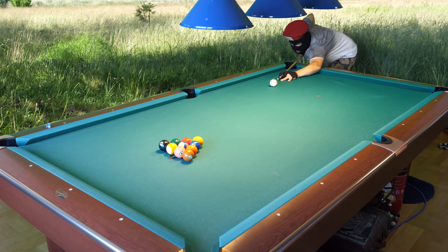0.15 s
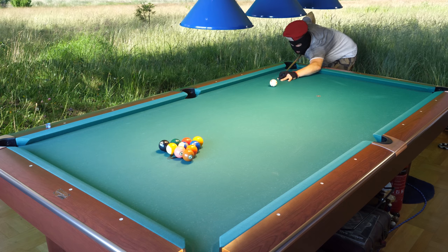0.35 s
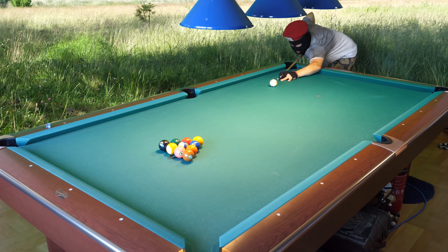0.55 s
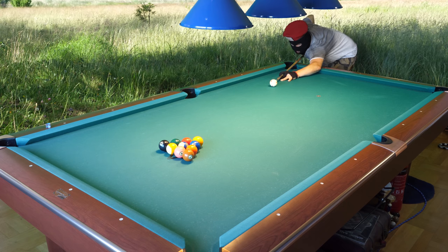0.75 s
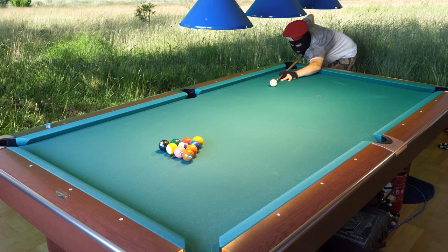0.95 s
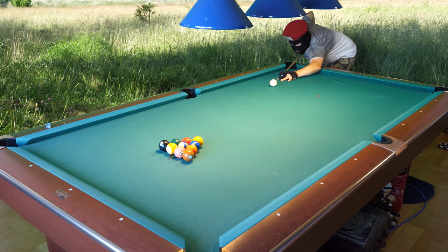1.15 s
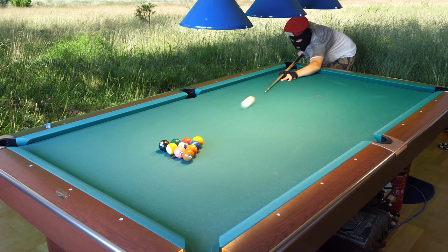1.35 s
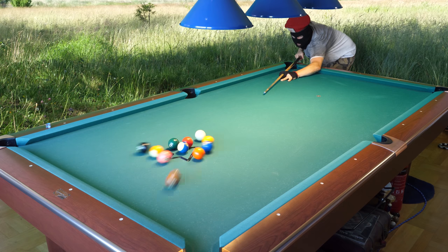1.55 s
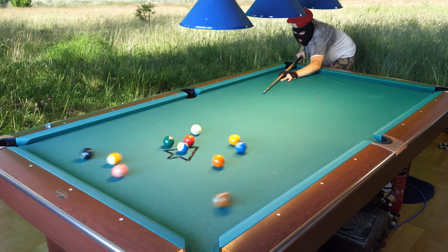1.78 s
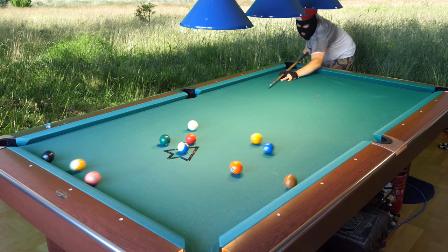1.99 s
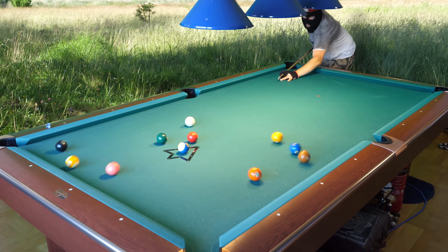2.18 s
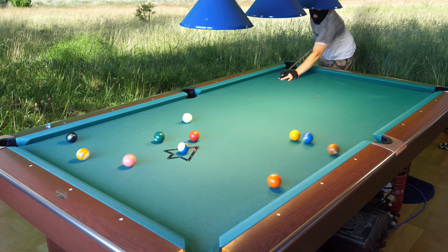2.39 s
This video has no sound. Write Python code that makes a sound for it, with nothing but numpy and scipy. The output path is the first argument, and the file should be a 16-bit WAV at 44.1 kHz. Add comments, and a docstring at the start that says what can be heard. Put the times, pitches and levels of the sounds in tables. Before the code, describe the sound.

A pool break, heard from the foot of the table in an open-air shelter. After faint outdoor air, a cue strike leads to sharp, slightly distorted cracks, followed by dull cushion thumps, low rolling and two ball clicks.

```python
"""Pool balls crack together in a break, each impact a short pressure pulse that excites an echoing shelter.
The cue strikes first and rings in its modes; the cue ball bursts the rack, balls thump into the cushions
and rumble over the resonant bed, then two pairs click. Cloth scuffs softly over the air of a meadow.
Heard from the foot of the table, the loud cracks overload the recorder, which clips them."""
import sys
import numpy as np
from scipy import signal
from scipy.fft import rfft, irfft, next_fast_len
from scipy.io import wavfile
from scipy.ndimage import map_coordinates

SR = 44100
rng = np.random.default_rng(int(sys.argv[2]) if len(sys.argv) > 2 else 0)


def digitize_waveform(pressure):
    """Quantize a signal to 16-bit integers and store it at the path in sys.argv[1].

    Rows of a 2-D input are taken as channels; values are limited to [-1, 1].
    """
    field = np.atleast_2d(pressure).T
    bounded = np.clip(field, -1, 1)
    quanta = np.round(bounded * 32767).astype(np.int16)
    wavfile.write(sys.argv[1], SR, quanta)


N = 106942
T = np.arange(N) / SR


# ball-on-ball impacts (time [s], level [dB], frequency scale [ratio], tail over direct sound [dB])
COLLISIONS = [(1.545, 38, 1.09, 4), (1.551, 34.5, 0.9, 5.5), (1.577, 37, 1.023, 4), (1.605, 32, 1.035, 7.5),
              (2.287, 26.5, .98, 3.5), (2.421, 16.5, 1.02, -7)]
# one contact pulse, a main lobe and weak side lobes (frequency [Hz], level [dB])
CONTACT_SPECTRUM = [(60, -16.5), (300, -32.5), (650, -14.5), (1100, -5.5), (1600, -0.5), (2100, 0.5),
                    (2800, -2), (3400, -11.5), (4300, -29), (5800, -34), (7500, -32), (10000, -33.5),
                    (12200, -25.5), (14200, -27), (16000, -40)]
def ball_clicks():
    """Elastic impact: a shorter contact has a higher spectrum; all the ring is the shelter's."""
    return sum(impact(time, db, lambda hz: along(CONTACT_SPECTRUM, hz / scale), tail_db)
               for time, db, scale, tail_db in COLLISIONS)


# knock of the tip on the cue ball (frequency [Hz], level [dB])
KNOCK_SPECTRUM = [(40, -28), (120, -16), (350, -3.5), (620, -2.5), (1000, -6.5), (1900, -10.5),
                  (2600, -8.5), (3000, -15), (4000, -16.5), (7500, -20.5), (10000, -23), (15000, -20.5)]
# short tock of the tip itself (frequency [Hz], level [dB], T60 [s])
TIP_MODES = [(874, -5, 0.083), (1190, -1, 0.02)]
# modes of the shaft (frequency [Hz], relative level [dB], T60 before stretching [s])
SHAFT_MODES = [(135, -16, 1.2), (236, -12, .6), (341, -7, .3), (389, -5, .35), (841, -8, .25),
               (1118, -8, .25), (1458, -6, .27), (1686, -14, .8), (1730, -12, .35), (2136, -8, .28),
               (2464, -6, .25), (2530, -5, .3), (2853, -16, .4), (3270, -8, .22), (3585, -17, .3),
               (4797, -24, .28)]
def cue_strike(time=1.3158, attack_s=0.0066, t60_stretch=1.13):
    """Free vibration: the shaft's modes colour the knock, then ring on as damped sinusoids."""
    phases = rng.uniform(-np.pi, np.pi, (len(SHAFT_MODES), 2))
    ring = 0
    for (hz, db, t60), (phase, apart) in zip(SHAFT_MODES, phases):
        stereo_phase = apart * (1 - along(COHERENCE, hz)) / 2 * np.array([[1], [-1]])
        ring += amp(db) * decay(t60 * t60_stretch) * np.sin(2 * np.pi * hz * T + phase + stereo_phase)
    ring *= 1 - np.exp(-T / attack_s)
    tock = sum(amp(db) * decay(t60) * np.sin(2 * np.pi * hz * T) for hz, db, t60 in TIP_MODES)
    lift_db = lambda hz: 4 * sum(resonance(hz, centre, width_hz=88) for centre, _, _ in SHAFT_MODES)
    knock_db = lambda hz: along(KNOCK_SPECTRUM, hz) + lift_db(hz)
    knock = impact(time, db=21.5, spectrum_db=knock_db, tail_db=14.5)
    return knock + at(time, tock + amp(-7.5) * ring)


# balls striking the bed or a cushion (time [s], level [dB])
THUMP_EVENTS = [(1.546, 15), (1.708, 25), (1.745, 21), (1.795, 8.5), (2.025, 5), (2.171, 3.5)]
# one soft contact (frequency [Hz], level [dB])
THUMP_SPECTRUM = [(25, -5.5), (60, -5.5), (110, -1), (160, -2), (200, -3), (290, -2.5), (380, -6),
                  (480, -6), (700, -17.5), (1500, -40.5), (5000, -71)]
def cushion_thumps():
    """Compliant impact: a soft contact shakes the table mainly at low frequencies."""
    spectrum_db = lambda hz: along(THUMP_SPECTRUM, hz) + table_lift_db(hz, rolling=False)
    return sum(impact(time, db, spectrum_db, tail_db=11) for time, db in THUMP_EVENTS)


# envelope of the balls rolling on the bed (time [s], level [dB])
ROLL_LEVEL = [(1.31, -102), (1.36, -25.5), (1.45, -23), (1.6, -18), (1.82, -31), (1.97, -37.5), (2.05, -24),
              (2.23, -29), (2.27, -35), (2.42, -40)]
# rolling noise (frequency [Hz], level [dB])
ROLL_SPECTRUM = [(25, -31), (60, -3), (100, -4), (160, 1.5), (300, -11.5), (420, -12), (600, -23),
                 (1200, -41), (4000, -58.5), (10000, -58), (15000, -71)]
def rolling_balls():
    """Forced vibration: rolling balls drive the table's resonances with low noise."""
    rumble = diffuse_noise(lambda hz: along(ROLL_SPECTRUM, hz) + table_lift_db(hz, rolling=True))
    return amp(np.interp(T, *np.transpose(ROLL_LEVEL))) * rumble


# the table's peaks and dips (frequency [Hz], width [Hz], gain when thumped [dB], gain when rolled on [dB])
TABLE_RESONANCES = [(112, 10, 8, 5), (134, 9, 2, 3), (183, 20, -6, -6), (232, 12, 1, 12), (258, 20, -5, -5),
                    (297, 22, 5, 4), (361, 13, 9, 8), (390, 12, 6, 2)]
def table_lift_db(hz, rolling):
    """Modal response: the strength of each peak or dip depends on how the table is excited."""
    return sum((roll_db if rolling else thump_db) * resonance(hz, centre, width)
               for centre, width, thump_db, roll_db in TABLE_RESONANCES)


# soft rubs on cloth (time [s], level [dB], rise [s], T60 [s])
SCUFF_EVENTS = [(0.466, -60, 0.027, 0.4), (1.24, -59, .06, .8), (2.166, -29, 0.025, 0.4)]
# rubbing noise (frequency [Hz], level [dB])
SCUFF_SPECTRUM = [(100, 5.5), (600, -10), (1200, -0.5), (2100, -4), (3200, -11.5), (5000, -19),
                  (8000, -19.5), (10000, -24.5), (12000, -32), (15000, -38.5)]
def cloth_scuffs():
    """Sliding friction: each rub is broadband noise that swells and dies away."""
    scuffs = 0
    for time, db, rise, t60 in SCUFF_EVENTS:
        swell = np.sin(np.pi / 2 * np.minimum(T / rise, 1)) ** 2
        friction = diffuse_noise(lambda hz: along(SCUFF_SPECTRUM, hz))
        scuffs += amp(db) * at(time, friction * swell * decay(t60))
    return scuffs


# early reflections (arrival time [s], relative level [dB], left lead [s])
REFLECTIONS = [(.00055, -4, -.00004), (.0027, -8, -.0001), (.0054, -2, -.00004), (.0059, -3, -.00003),
               (.0064, -2, -.00003), (.0119, -4, -.00005), (.0129, -6, .00005), (.014, -5, .00005),
               (.0255, -8, .0001), (.0385, -4, .00003), (.0582, -9, .00005)]
# what the walls give back (frequency [Hz], level [dB])
TAIL_SPECTRUM = [(300, -2.5), (3500, -1.5), (6000, -2.5), (10000, -4), (15000, -20.5)]
# decay of the tail (frequency [Hz], T60 [s])
REVERB_TIME = [(100, 0.53), (300, 0.66), (800, 0.59), (2000, 0.55), (4000, 0.45), (8000, 0.35), (14000, .3)]
# build-up of the tail, slower in the bass (frequency [Hz], time constant [s])
REVERB_RISE = [(300, 0.018), (700, 0.02), (1500, .006), (10000, .005)]
def shelter(tail_db):
    """Reverberation: the impulse response sums a direct path, early reflections and a diffuse tail."""
    hz, t, bands = signal.stft(diffuse_noise(lambda hz: along(TAIL_SPECTRUM, hz)), SR, nperseg=256)
    fall = amp(-60 * t / along(REVERB_TIME, hz)[:, None])
    rise = 1 - np.exp(-t / along(REVERB_RISE, hz)[:, None])
    tail = signal.istft(bands * fall * rise, SR, nperseg=256)[1][:, :N]
    response = amp(tail_db) * tail / np.linalg.norm(tail[0])
    direct = (0.00091, 0.011, -0.00002)  # same columns as REFLECTIONS
    echoes = [(arrival, db - 2.5, lead) for arrival, db, lead in REFLECTIONS]
    for arrival, db, lead in [direct] + echoes:
        response[0, round((arrival + max(-lead, 0)) * SR)] += amp(db)
        response[1, round((arrival + max(lead, 0)) * SR)] += amp(db)
    return response


# outdoor air and microphone hiss (frequency [Hz], level [dB])
AIR_SPECTRUM = [(22, -1.5), (50, 0), (85, -7), (165, -8.5), (280, -16.5), (500, -25), (1000, -29.5),
                (2000, -33), (3300, -37), (5000, -40), (7500, -36.5), (10000, -39), (11000, -45),
                (12500, -41), (15500, -50)]
# gain of the air's low rumble (time [s], level [dB])
RUMBLE_LEVEL = [(0, 4), (.12, 4.5), (.18, -4), (.55, 0), (.85, -2), (1.15, -5.5), (1.21, -1.5), (1.27, 3.5),
                (1.4, 8)]
def meadow_air(sway_db=1.5, sways_per_s=9, corner_hz=200):
    """Amplitude modulation: the low band of the ambient noise wavers under a steady hiss."""
    sway = map_coordinates(rng.standard_normal(32), [T * sways_per_s], mode="mirror")
    ambience = diffuse_noise(lambda hz: along(AIR_SPECTRUM, hz))
    rumble = filtered(ambience, lambda hz: 1 / (1 + (hz / corner_hz) ** 2))
    rumble_gain = amp(sway_db * sway + np.interp(T, *np.transpose(RUMBLE_LEVEL)))
    return amp(-47) * (ambience + rumble * (rumble_gain - 1))


# faint low sound at the start (frequency [Hz], level [dB])
MURMUR_SPECTRUM = [(40, -30), (130, -20), (380, 3), (600, -5), (1000, -30), (4000, -42.5)]
def fading_murmur():
    """Exponential decay: a low band of noise dies away in the first moments."""
    return amp(-46.5) * decay(t60=0.49) * diffuse_noise(lambda hz: along(MURMUR_SPECTRUM, hz))


# likeness of left and right (frequency [Hz], coherence [ratio])
COHERENCE = [(30, .45), (70, 0.32), (140, 0.53), (340, 0.86), (650, 0.59), (1200, 0.62), (2000, .28),
             (3400, 0.1), (8000, 0.23)]
def diffuse_noise(spectrum_db):
    """Diffuse field: noise of rms 1 arrives from all around, partly coherent between the channels."""
    angle = lambda hz: np.arccos(np.clip(along(COHERENCE, hz), -1, 1)) / 2
    gains = lambda hz: amp(spectrum_db(hz)) * [np.cos(angle(hz)), np.sin(angle(hz))]
    mid, side = filtered(rng.standard_normal((2, N)), gains)
    noise = np.array([mid + side, mid - side])
    return noise / np.sqrt(np.mean(noise ** 2) + 1e-20)


def impact(time, db, spectrum_db, tail_db):
    """Convolution: one contact pulse sounds through the shelter's impulse response."""
    return amp(db) * at(time, filtered(shelter(tail_db), lambda hz: minimum_phase(spectrum_db(hz))))


def resonance(hz, centre, width_hz):
    """Lorentzian peak, 1 at its centre."""
    return 1 / (1 + (2 * (hz - centre) / width_hz) ** 2)


def decay(t60):
    """Exponential damping, 60 dB in t60 seconds."""
    return np.exp(-np.log(1000) * T / t60)


def amp(db):
    """Decibels to amplitude ratio."""
    return 10 ** (np.asarray(db) / 20)


def along(points, hz):
    """Interpolation of (frequency, value) points on a logarithmic frequency axis."""
    frequencies, values = np.transpose(points)
    return np.interp(np.log(hz + 1), np.log(frequencies + 1), values)


def at(time, sound):
    """Pure delay: a stereo sound starts at this time in seconds."""
    return np.pad(sound, ((0, 0), (max(round(time * SR), 0), 0)))[:, :N]


def filtered(sound, response):
    """Linear filtering: the spectrum is multiplied by a frequency response."""
    size = 2 * next_fast_len(N)
    return irfft(rfft(sound, size) * response(np.fft.rfftfreq(size, 1 / SR)), size)[..., :N]


def minimum_phase(db):
    """Causality: folding the cepstrum onto positive time gives these gains their minimum phase."""
    cepstrum = irfft(np.log(amp(db)))
    half = len(cepstrum) // 2
    folded = np.concatenate([cepstrum[:1], 2 * cepstrum[1:half], cepstrum[half:half + 1]])
    return np.exp(rfft(folded, len(cepstrum)))


def scene():
    """Superposition: the sources add, with the table's low sounds and the background a little left."""
    centred = cue_strike() + ball_clicks() + cloth_scuffs()
    leftward = cushion_thumps() + rolling_balls() + meadow_air() + fading_murmur()
    return centred + leftward * amp([[0.67], [-0.67]])


# tone of the recorder after the overload (frequency [Hz], gain [dB])
RECORDER_TONE = [(4500, 1.5), (7600, -7), (9000, -3), (10000, 2.5), (11200, -3), (14500, 7), (15900, -2.5)]
def record(dry, ceiling=0.71, hardness=28, cutoff_hz=15750):
    """Saturation: the input clips; the recorder then colours the treble and limits the band."""
    clipped = dry / (1 + np.abs(dry / ceiling) ** hardness) ** (1 / hardness)
    lowpass = lambda hz: 1 / (1 + (hz / cutoff_hz) ** 160)
    return filtered(clipped, lambda hz: minimum_phase(along(RECORDER_TONE, hz)) * lowpass(hz))


dry = scene()
out = record(dry)
digitize_waveform(out)
```